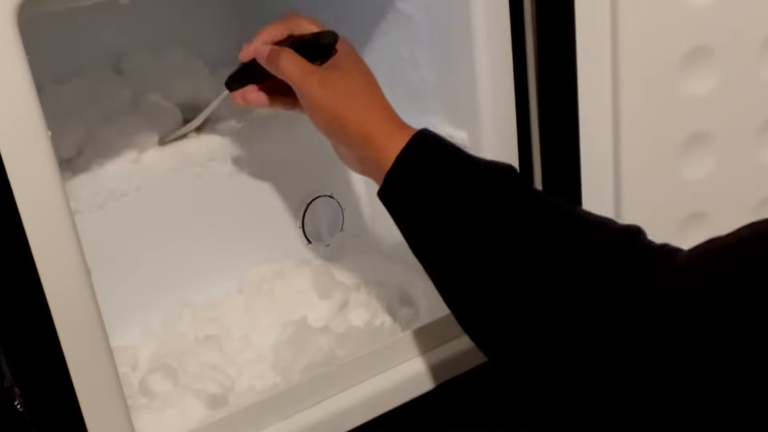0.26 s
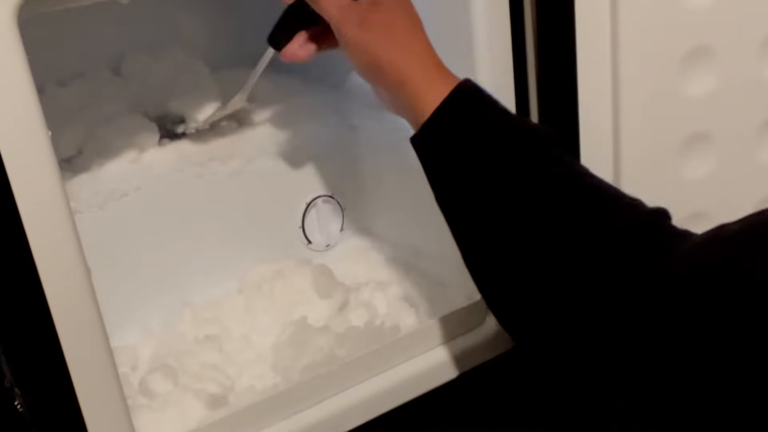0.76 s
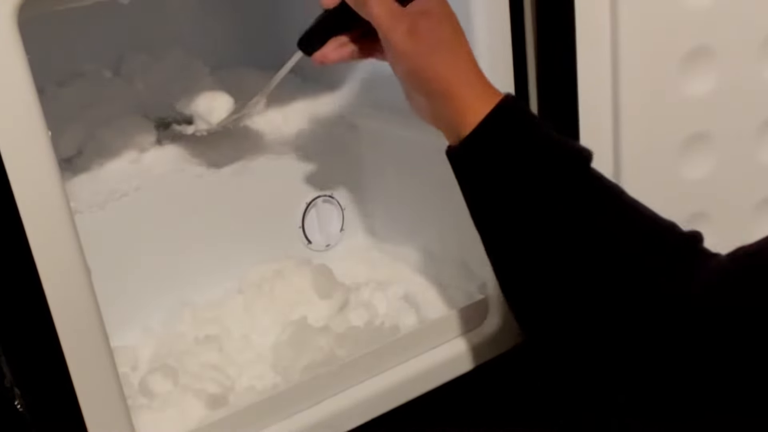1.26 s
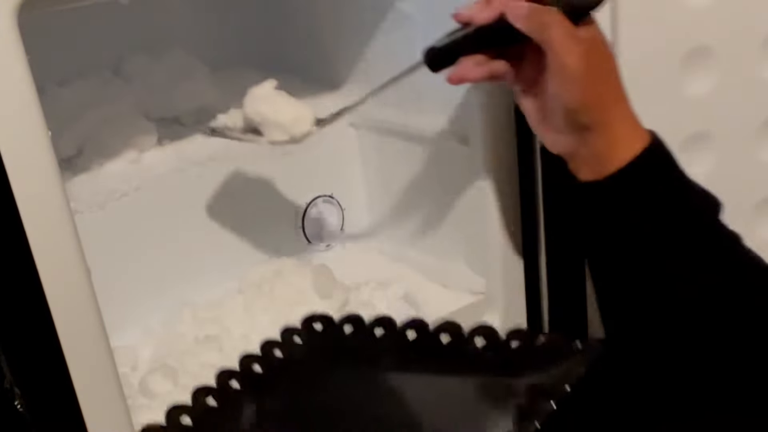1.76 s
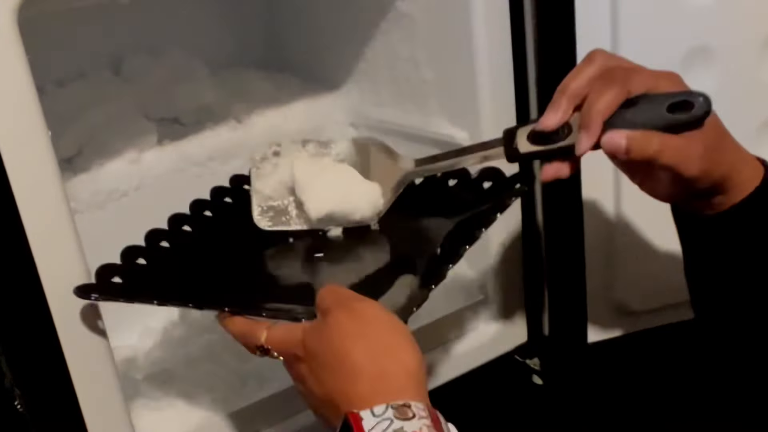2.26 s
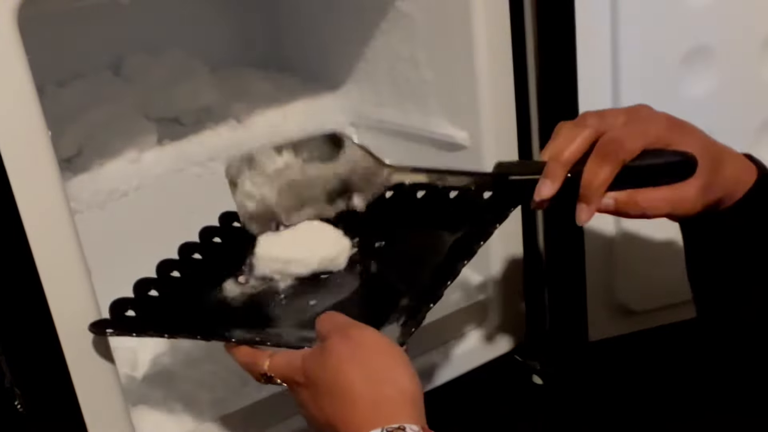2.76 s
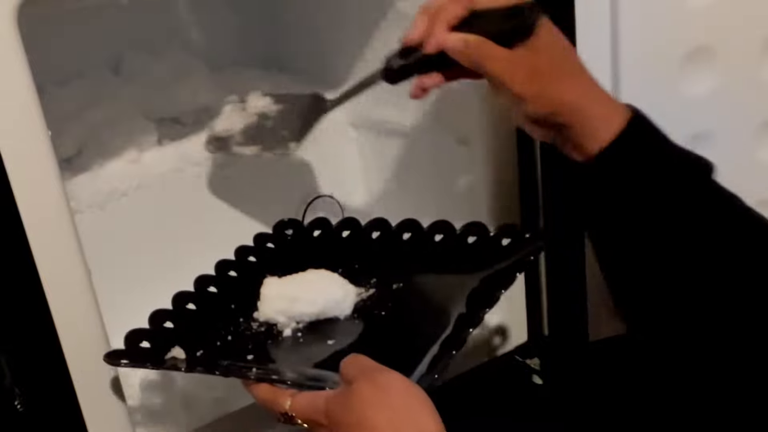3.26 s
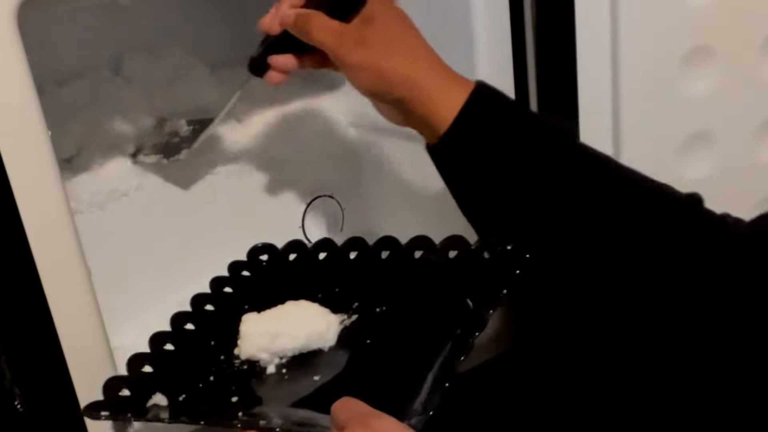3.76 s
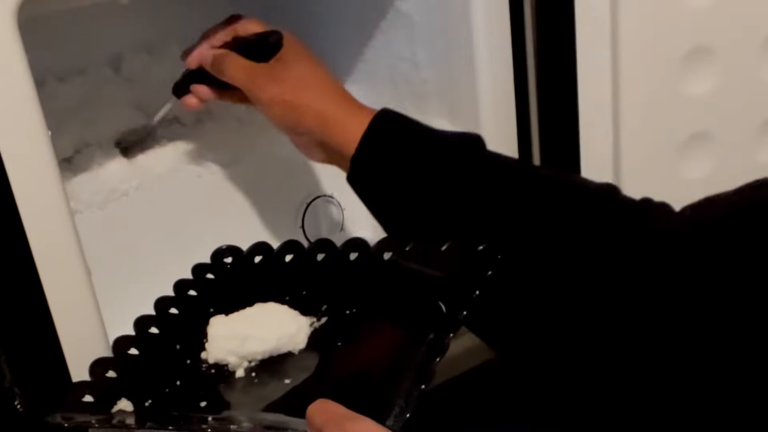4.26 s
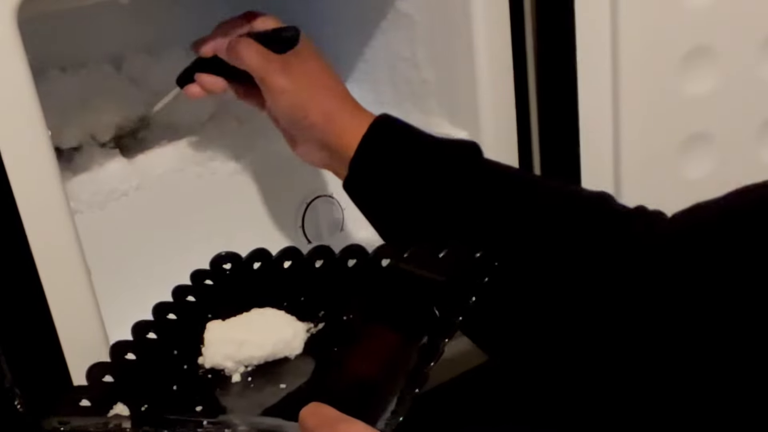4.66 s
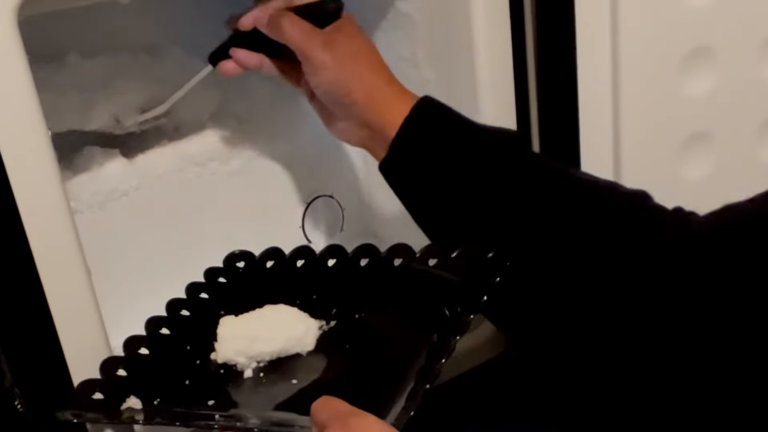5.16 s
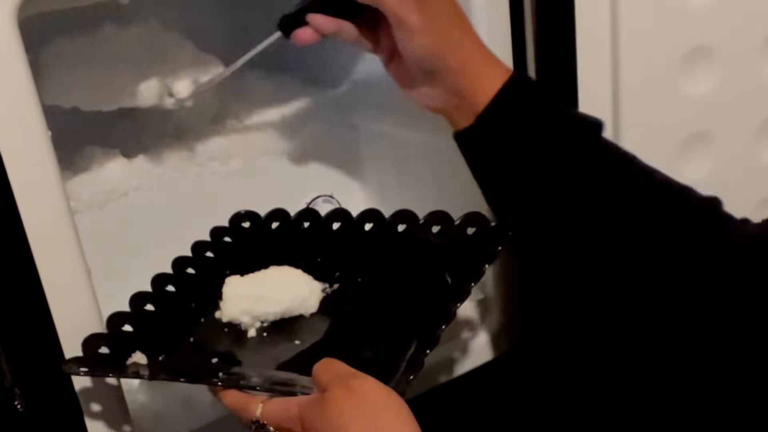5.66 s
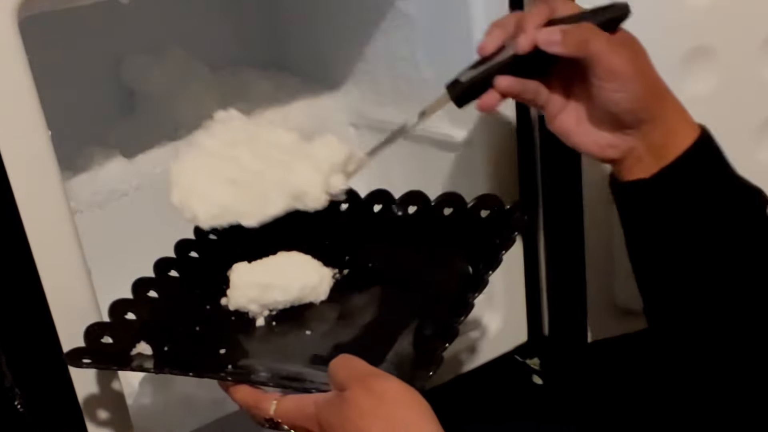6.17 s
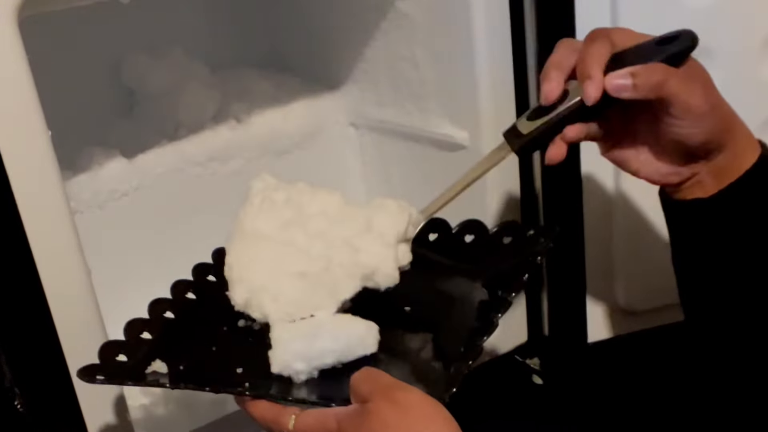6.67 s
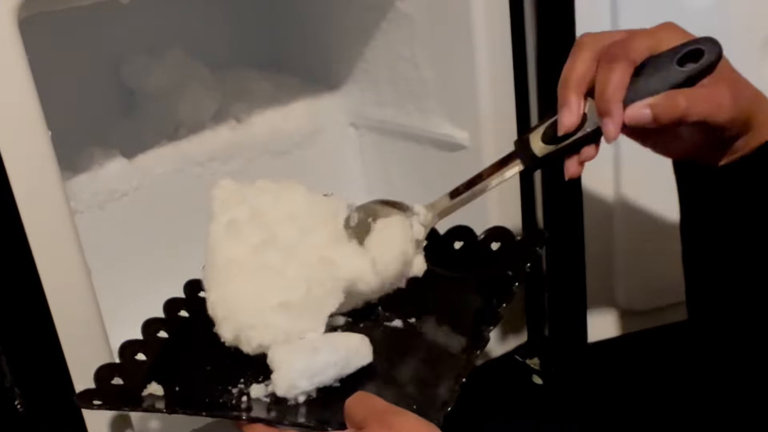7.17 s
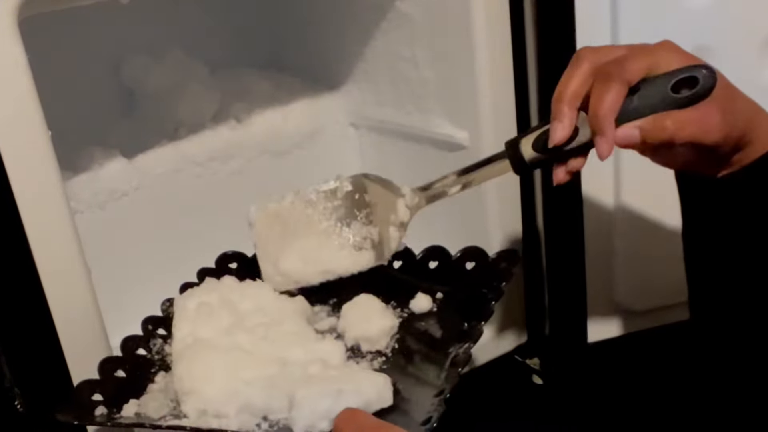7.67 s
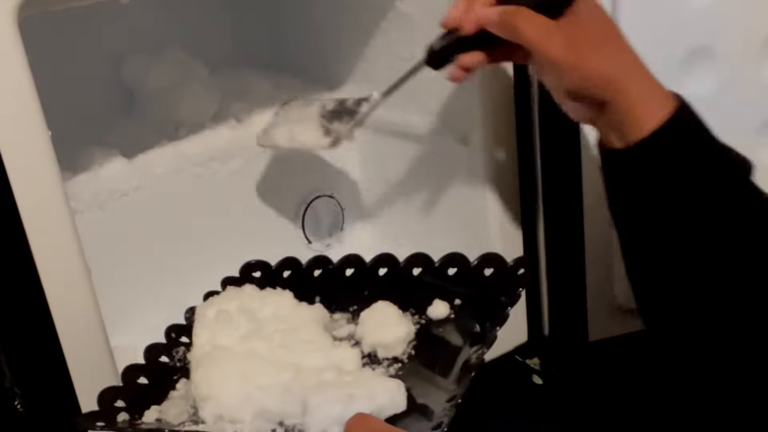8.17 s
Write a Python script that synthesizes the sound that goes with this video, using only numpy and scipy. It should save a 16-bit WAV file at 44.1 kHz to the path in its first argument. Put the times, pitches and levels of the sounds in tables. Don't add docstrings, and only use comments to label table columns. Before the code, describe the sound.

Close stereo sound at an open freezer: low compressor rumble and a faint high whine run beneath everything. From 0 to 0.3 s a metal spatula ploughs hard frost with loud, gritty crunching, then scrapes lightly until about 1 s; a few crumbs tick around 1.1-1.3 s. Near quiet follows. At 2.2, 2.4 and 2.7 s a lump lands on a plastic tray with sharp, bright cracks and scattering grains. At 3.5 s the blade strikes again; from 3.75 to 4.4 s it grinds hard, squeaking roughly, loudest near 4.06 s, until a slab snaps loose with a low knock. Softer grating and ticks fade by 5.7 s. From 6.25 s the slab scuffs and slides on the tray, cracking at 6.9 s. At 7.24-7.6 s it topples and shatters in a heavy, overloaded crunch with hollow thumps. Final cracks snap at 7.7 and 8.04 s, then crumbs die into hum by 8.4 s.

```python
import sys
import numpy as np
from scipy import signal
from scipy.fft import rfft, irfft, next_fast_len
from scipy.io import wavfile
from scipy.ndimage import uniform_filter1d, map_coordinates

SR = 44100
rng = np.random.default_rng(int(sys.argv[2]) if len(sys.argv) > 2 else 0)


def ratio_of_db(decibels):
    return 10 ** (np.asarray(decibels, float) / 20)


def master_out(mix):
    frames = np.transpose(np.atleast_2d(mix))
    ceiling = np.clip(frames, -1, 1)
    pcm = np.round(ceiling * 32767).astype(np.int16)
    wavfile.write(sys.argv[1], SR, pcm)


N = 371322

# (time [s], share [0-1])
ON_TRAY = [(0, 0), (2.0, 0), (2.1, 1), (3.2, 1), (3.3, 0), (6.0, 0), (6.1, 1), (8.42, 1)]

# (frequency [Hz], width [Hz], level [dB])
CABINET_MODES = [(192, 28.5, -0.5), (277.6, 39, -2), (391, 128, -1), (596, 140, -0.5), (737, 140, -12)]
SHELF_MODES = [(780, 250, -3), (1160, 235, -1), (1420, 244, -3), (1723, 226, -3), (2000, 550, -7.5)]
TRAY_MODES = [(850, 187, -4), (1149, 117, 2), (1590, 520, -5), (1920, 104, -0.5), (2080, 280, -9.5)]
HOLLOW_MODES = [(136, 21.5, -3.5), (196.6, 15, -2.5), (341, 81, -1.5), (505, 70, -2), (643, 124, -10.5)]
BLADE_MODES = [(3040, 380, -7.5), (5500, 3200, -22.5)]

# (frequency [Hz], density [dB per Hz])
CRUSH_SPECTRUM = [(1500, -49.5), (2600, -4), (4000, -6.5), (6500, -5), (8200, 6), (9500, -33)]
FIZZ_SPECTRUM = [(7000, -57), (8600, 0), (10500, 2), (12500, 3.5), (14000, 6.5), (15600, -4), (16500, -19)]
SPARK_SPECTRUM = [(1000, -15), (3000, -2.5), (7000, 1), (12000, -2.5), (15700, -2.5), (17000, -27)]

# (frequency [Hz], density [dB per Hz])
RUMBLE_SPECTRUM = [(20, -29), (55, 6), (130, -0.5), (220, -12.5), (380, -16.5), (470, -27), (1000, -38),
                   (3000, -48.5), (6500, -46), (9000, -41.5), (12000, -49), (16000, -55)]
# (time [s], level [dB])
FREEZER_DB = [(0.0, -24), (0.7, -27), (1.15, -25.5), (1.45, -29.5), (2.16, -27), (2.32, -25), (2.56, -26.5),
              (3.49, -26.5), (3.73, -28), (3.98, -23.5), (5.32, -27.5), (6.85, -27), (7.5, -24.5),
              (7.69, -26), (8.42, -27)]
# (frequency [Hz], width [Hz], rms level [dB])
HUMS = [(60, 20.7, -33), (125.2, 16, -39.5), (213.7, 5.1, -45.5), (265.9, 7.9, -49), (882, 28, -62.5),
        (11220, 450, -61.5)]
# (time [s], frequency [Hz], level [dB])
WHISTLE = [(0, 9150, -64), (1.3, 9170, -59), (1.5, 9130, -55.5), (3.5, 9070, -57), (4.9, 9250, -60),
           (5.4, 9400, -56), (6.1, 9360, -60), (8.42, 9420, -57)]

# (frequency [Hz], t60 [s])
ECHO_T60 = [(200, 0.43), (1000, 0.13), (5000, 0.37), (13000, 0.29)]
# (frequency [Hz], level [dB])
MID_COLOUR = [(5500, -1.5), (9000, 0.5), (11000, 1), (14000, -4)]
SIDE_COLOUR = [(60, -15.5), (140, -12), (330, -7), (600, -0.5), (1200, -6), (2700, -3.5), (5000, -1),
               (8000, -9), (10000, 4), (13500, -5.5), (15500, -3.5)]
# (frequency [Hz], level [dB])
MID_DIP = [(6400, 0), (7000, -14), (7700, -22), (8500, -18), (9050, 0), (13200, 0), (14200, -12),
           (15500, -22)]
SIDE_DIP = [(9600, 0), (10500, -9), (11300, -13), (12300, -17), (13000, -10), (13600, 0)]

# (time [s], force [dB], depth [dB])
PLOUGH = [
    (0, -24.5, 10.5),
    (.07, -17.5, 2),
    (.125, -20.5, 6.5),
    (.16, -18.5, 2),
    (.21, -20.5, 5),
    (.26, -29.5, 11),
    (.37, -33.5, 4.5),
    (.72, -34, 7.5),
    (.87, -45, 6),
    (1.08, -63, 24.5),
]
CARRY = [
    (1.36, -56.5, 2.5),
    (1.6, -52.5, 4.5),
    (2.17, -52.5, 8.7),
    (2.6, -53, 19.7),
    (2.68, -68, 19),
    (3.05, -66, 7.7),
]
THRUST = [
    (3.49, -60, 2),
    (3.52, -25.5, -17.5),
    (3.56, -31, 3),
    (3.765, -32.5, -1.5),
    (3.79, -26.5, -8.5),
    (3.96, -22, -6),
    (4.06, -17, 7),
    (4.22, -21.5, 11),
    (4.374, -22, 9),
]
PRISE = [
    (4.384, -28, 26),
    (4.42, -47, 31),
    (4.49, -39, 7.2),
    (4.55, -34.5, 2.7),
    (4.86, -34, 5.6),
    (4.93, -44.5, 9.2),
    (5.14, -40, 7.1),
    (5.46, -51.5, 2.4),
    (6.21, -69, 6.1),
]
SLIDE = [
    (6.26, -31, 4),
    (6.36, -44, -4),
    (6.468, -29, 7),
    (6.54, -36, 4.5),
    (6.68, -34.5, 2),
    (6.85, -37.5, -13),
    (7.16, -41, 6),
    (7.23, -25, -10),
]
TIP = [
    (7.24, -12, -1.5),
    (7.27, -17.5, 5),
    (7.32, -10, 7),
    (7.412, -20.5, 2),
    (7.46, -5, -8),
    (7.49, -20, 2.5),
    (7.54, -23, 5.5),
    (7.59, -32.5, 10.5),
    (7.69, -51, -5),
]
WITHDRAW = [
    (7.72, -29, -54),
    (7.84, -47, -55),
    (8.02, -56, -46),
    (8.21, -60.5, -9),
    (8.42, -67, -12),
]
# (time [s], force [dB], depth [dB], rolling time [s])
LANDINGS = [(1.104, -39.5, 18, .1), (1.151, -35.5, -15, 0.078), (1.256, -38, -24, 0.077),
            (2.219, -29, 10, .2), (2.37, -34, -9, 0.04), (2.401, -26.5, -10, 0.18), (2.69, -26, -9, .1),
            (2.71, -19.5, -27, .28), (2.741, -24.5, 9.5, 0.27), (5.152, -30.5, 2.5, 0.3),
            (6.862, -23.5, 2, 0.12), (6.886, -27.5, 0, 0.12), (7.707, -34.5, 19, 0.05),
            (7.74, -24.5, 3, 0.11), (8.043, -34, -24, 0.089)]
BURST_T60_S, CRUMBS_T60_S, SETTLE_T60_S = 0.23, 1.34, 0.074
CRUMBS_DB, GATHER_S = -15.5, 0.0029

FOLLOWS_DEPTH = [-0.016, 0.19, 1, -0.21]
ON_SHELF_DB = [-1, 2, -0.2, -2.5]
ON_TRAY_DB = [1, 1, -3, -4]
TRAY_THUMP_DB, TRAY_CRUNCH_DB = -4, -0.5

# (middle [s], length [s], level [dB], pitch [Hz])
SHELF_SCUFFS = [(.146, 0.019, -9, 2000), (.157, .01, -6.5, 3900), (0.17, 0.011, -14.5, 3500),
                (.16, .02, -8.5, 620), (.05, 0.028, -16, 1200), (.2, 0.027, -10, 1300),
                (1.045, .04, -32.5, 1200), (1.04, .04, -38, 1550), (1.118, 0.022, -33, 1400),
                (1.295, 0.011, -36, 3000), (4.068, .016, -18.5, 1090), (1, 0.045, -35, 1300),
                (1.125, .05, -29, 800), (0.99, .05, -39, 900), (3.88, 0.023, -16, 1400),
                (3.885, 0.07, -24.5, 4950), (4.05, 0.054, -19, 4900), (4.03, .09, -8, 7700),
                (4.13, .08, -26, 4900), (4.066, 0.011, -17.5, 4500), (4.27, .025, -20.5, 2870),
                (4.275, 0.0248, -19, 3900), (4.06, 0.033, -9.5, 400), (4.1, .03, -13, 421),
                (4.18, .02, -13, 550), (4.208, 0.0196, -2.5, 400), (4.27, .03, -12.5, 450),
                (4.386, 0.0116, 0, 490), (4.41, .04, 0, 430), (4.465, 0.0305, -10.5, 390),
                (3.535, .02, -17, 1700), (3.675, .025, -25, 1600), (.913, .008, -34, 3300),
                (0.94, 0.054, -34, 870), (1.2, .008, -28, 5500), (4.555, 0.04, -26.5, 5050),
                (.7, 0.086, -35, 1500), (0.694, .08, -33, 2900), (4.0, .04, -14.5, 450),
                (4.565, .035, -30.5, 3600), (4.2, 0.041, -25, 1900), (5, .1, -37, 1700),
                (4.1, .07, -35, 3100), (4.83, .08, -30.5, 1950), (4.71, 0.049, -26, 1200),
                (5.155, .02, -27, 3040), (5.245, .03, -36, 1390)]
TRAY_SCUFFS = [(2.2196, 0.004, -9, 2510), (2.234, 0.004, -14, 2900), (2.225, 0.01007, -14, 1610),
               (2.229, .018, -15, 903), (2.232, .024, -11.5, 400), (2.411, .012, -19, 1200),
               (7.745, 0.011, -19, 1490), (7.187, 0.023, -17.5, 2730), (7.187, 0.021, -17.5, 1620),
               (7.215, 0.013, -20, 1170), (7.249, .014, -1, 490), (7.2502, 0.015, 0, 1149),
               (7.27, .02, -11.5, 1715), (7.298, .008, -7.5, 596), (7.287, .012, -11, 2080),
               (7.304, 0.01795, -5, 400), (7.308, .02, -4.5, 998), (7.312, 0.032, -4.5, 2110),
               (7.322, .022, 0.5, 1220), (7.356, .012, -13, 3800), (7.361, .02, -10.5, 1480),
               (7.435, .02, -11, 2000), (7.46, 0.015, -8.5, 3195), (7.468, 0.021, -5.5, 417),
               (7.472, .018, -4.5, 1245), (7.51, .016, -10, 450), (7.51, 0.015, -6, 2990),
               (7.603, .014, -18.5, 1480), (6.275, 0.029, -21.5, 490), (6.48, 0.027, -36, 1810),
               (6.69, .06, -25, 1192), (6.701, 0.069, -30.5, 2510), (6.745, 0.019, -25, 2120),
               (6.9, .025, -24, 2190), (6.897, .02, -15.5, 520), (7.01, 0.015, -25, 1750),
               (7.125, 0.021, -27.5, 2764), (6.81, .02, -27.5, 2130), (7.654, .014, -22, 1200)]
SCUFF_SHARE, SCUFF_WANDER_HZ, SCUFF_GRAIN_DB = 0.22, 230, 4

# (time [s], peak [dB], weight [dB], shard pitch [Hz])
SHELF_CRACKS = [(.154, -9, -3.5, 3320), (.2856, -11.5, -7.5, 3320), (.4409, -34, 3, 2070),
                (.5906, -46, -7, 3140), (.753, -20.5, -29, 5100), (1.1131, -34, 0, 5000),
                (3.5073, -23, -18, 2150), (3.527, -10, -12.5, 1740), (3.665, -20.5, -9.5, 1660),
                (3.776, -15, -4, 3230), (3.8273, -23.5, 1, 3180), (3.926, -13, -18, 3350),
                (3.9527, -15, -21, 3360), (4.0629, 1, -6.5, 3200), (4.2646, -12, -6, 2860),
                (4.3795, -10.5, 7, 1930), (4.5705, -29, -6, 4970), (4.664, -16.5, -9.5, 1850),
                (5.0055, -26, -30, 5520), (5.1504, -24, -11.5, 3040), (5.292, -24, -26, 4100),
                (5.55, -39, -35, 2310), (5.61, -42, -40, 5500), (5.675, -32.5, -16, 5080)]
FIRST_LUMP_CRACKS = [
    (2.2045, -15, -4, 2720),
    (2.2183, -5, 3, 3000),
    (2.397, -27.5, -4.5, 2520),
    (2.4052, -2, -4.5, 2740),
    (2.4276, -29.5, -17, 2000),
    (2.7027, -8.5, -6.5, 1640),
    (2.7108, -0.5, -9, 3460),
    (2.742, 0.5, -8.5, 1880),
    (2.7923, -18, -26, 2600),
    (2.95, -30.5, -10, 3000),
]
SLAB_CRACKS = [(6.245, -26, 4, 2720), (6.256, -39, -6.5, 2870), (6.291, -52, -14, 2670),
               (6.472, -22, -13, 1800), (6.661, -25, -4.5, 2850), (6.731, -27, -23, 2190),
               (6.869, -33, 5, 2980), (6.889, -11, -2, 2970), (7.005, -18, -5.5, 1730),
               (7.118, -24, -3, 2760), (7.179, -12.5, -9, 2700), (7.211, -17, -6, 2850),
               (7.2416, 0, 5, 2620), (7.2943, 6, -3, 1960), (7.4307, 4, -25, 2050), (7.459, -5, 1, 2980),
               (7.505, 12, -5.5, 3030), (7.599, -11, -3, 2930), (7.6195, -28.5, 3, 3280),
               (7.6495, -13.5, -9, 3010), (7.7075, -1, -15, 2020), (7.7402, 0.5, -7, 6000),
               (7.9127, -28, -19, 5660), (7.928, -28.5, -26, 5500), (8.043, -7, -22, 5000),
               (8.375, -38, -34, 4720)]
CRACK_T60_S, HALVES_PER_DB = 0.018, 0.3042
CRUNCH_PER_WEIGHT, THUMP_PER_WEIGHT = 1, 1.42
RISE_SHARE = 0.012

# (time [s], peak [dB])
TICKS = [(.1336, -15), (0.149, -8), (.4005, -30), (.4344, -21.5), (.5726, -20), (.6459, -36), (.8345, -39),
         (1.1242, -23), (1.156, -33), (1.18, -33), (1.2639, -43), (.9083, -36), (3.778, -16), (3.665, -21),
         (4.063, -11), (4.378, -19), (2.232, -18), (2.39, -23), (2.8, -21), (2.989, -35), (6.295, -21),
         (6.413, -26), (6.448, -26), (6.557, -26), (6.786, -32), (6.805, -30), (6.941, -20), (6.981, -26),
         (7.046, -34), (7.096, -29), (7.212, -18.5), (0.155, -8.5), (3.528, -26), (1.3009, -23.5),
         (3.877, -16.5), (4.6486, -24), (4.7043, -26), (4.7791, -33), (4.797, -34), (5.0884, -36),
         (5.1486, -30), (5.2375, -24), (5.339, -33), (5.4338, -35), (5.611, -44), (7.006, -39), (7.283, -2),
         (7.32, -4), (7.356, -6.5), (7.441, -5), (7.601, -21), (7.652, -26), (8.377, -41)]
TICK_T60_S, TRAY_TICK_DULL_DB = 0.016, 3
# (time [s], peak [dB])
SPARKS = [(2.3685, -18.5), (5.7, -30.5), (2.2187, -12), (2.389, -24), (2.742, -5.5), (2.8942, -24.5),
          (.4885, -29), (7.2125, -17), (8.8, -21.5), (7.1205, -28), (5.0055, -27), (5.4, -28),
          (7.0055, -29), (7.2, -24), (7.7064, -5), (7.912, -23.5), (8.7, -31), (8.376, -31.5), (3.507, -26),
          (4.3795, -14.5), (2.7108, -7)]
SPARK_T60_S = 0.0058

# (time [s], level [dB], pitch [Hz], t60 [s], unsteadiness [0-1])
KNOCKS = [
    (1.18, -37, 1100, 0.079, 0.3),
    (4.3796, -1, 194, 0.12, 0),
    (5.61, -26, 4900, 0.015, 0.15),
    (7.304, -4.5, 127.6, 0.25, 0.08),
    (7.711, -11.5, 814, 0.046, 0.44),
    (8.044, -31, 1760, 0.046, 0),
    (3.781, -27, 1560, 0.087, 0),
    (6.89, -21, 1147, 0.22, 0),
    (7.625, -13.5, 1140, 0.074, 0.03),
]
# (time [s], level [dB])
SQUEAK_DB = [(3.75, -51), (3.82, -24), (3.96, -21.5), (4.074, -21.5), (4.14, -32), (4.186, -21.5),
             (4.202, -41), (4.3, -25)]
EDGE_HZ = 3310


def unit(x):
    return x / np.sqrt(np.mean(x ** 2) + 1e-20)


def along(points, hz):
    f, v = np.transpose(points)
    return np.interp(np.log(hz + 1), np.log(f + 1), v)


def curves(rows):
    s, *columns = np.transpose(rows)
    return [np.interp(np.arange(N) / SR, s, column) for column in columns]


def wobble(rate):
    knots = rng.standard_normal(int(N * rate / SR) + 4)
    return map_coordinates(knots, [np.arange(N) * rate / SR])


def filtered(x, response):
    m = next_fast_len(N + SR // 2)
    return irfft(rfft(x, m) * response(np.fft.rfftfreq(m, 1 / SR)), m)[..., :N]


def modes(table):
    def response(f):
        total = 0
        for k, (hz, width, db) in enumerate(table):
            damping = 1j * f * width
            total = total + (-1) ** k * ratio_of_db(db) * damping / (hz * hz - f * f + damping)
        return total
    return response


def scaled(response):
    def level(f):
        gain = response(f)
        return gain / np.sqrt(np.mean(np.abs(gain) ** 2))
    return level


def capsules(f, depth):
    dips = np.array([along(MID_DIP, f), along(SIDE_DIP, f)])
    return ratio_of_db(depth * dips + [along(MID_COLOUR, f), along(SIDE_COLOUR, f)])


def contact():
    force_db, depth_db = curves(PLOUGH + CARRY + THRUST + PRISE + SLIDE + TIP + WITHDRAW)
    tilt = np.array(FOLLOWS_DEPTH)[:, None]
    power = ratio_of_db(2 * (force_db + tilt * depth_db))
    t = np.arange(SR) / SR
    for s, db, deep_db, rolls in LANDINGS:
        crumbs_db = CRUMBS_DB - 60 * t / CRUMBS_T60_S - 60 * np.maximum(t - rolls, 0) / SETTLE_T60_S
        scatter = ratio_of_db(-120 * t / BURST_T60_S) + ratio_of_db(2 * crumbs_db)
        scatter *= 1 - np.exp(-t / GATHER_S)
        after = power[:, round(s * SR):][:, :SR]
        after += ratio_of_db(2 * (db + tilt * deep_db)) * scatter[:after.shape[1]]
    tray, = curves(ON_TRAY)
    return 10 * np.log10(power) + np.outer(ON_SHELF_DB, 1 - tray) + np.outer(ON_TRAY_DB, tray)


def sticking(level_db, hold):
    late = np.pad(level_db, (round(hold * SR), 0), mode="edge")[:N]
    return np.minimum(level_db, late)


def crystals(rate, spread_db, life, bed):
    draw = rng.random((2, N))
    size = -np.log(draw[1] + 0.03)
    snaps = (draw[0] < rate / SR) * ratio_of_db(spread_db * size)
    dying = signal.lfilter([1], [1, -np.exp(-1 / (life * SR))], snaps)
    return unit(bed + unit(dying))


def patchy(patchy_db):
    z = signal.stft(rng.standard_normal((2, N)), nperseg=256)[2]
    field = uniform_filter1d(rng.standard_normal(z.shape[1:]), size=3, axis=0)
    field = uniform_filter1d(field, size=6, axis=1)
    return unit(signal.istft(z * ratio_of_db(patchy_db * unit(field)), nperseg=256)[1][:, :N])


def blade(f):
    return scaled(lambda hz: ratio_of_db(along(CRUSH_SPECTRUM, hz)) * (1 + modes(BLADE_MODES)(hz)))(f)


def fizz(f):
    return scaled(lambda hz: ratio_of_db(along(FIZZ_SPECTRUM, hz)))(f)


def bodies(push, shelf_modes, tray_modes):
    tray, = curves(ON_TRAY)
    return filtered(push * (1 - tray), scaled(modes(shelf_modes))) + filtered(push * tray, scaled(modes(tray_modes)))


def frost():
    crush_db, crunch_db, cabinet_db, fizz_db = (sticking(db, hold=0.0049) for db in contact())
    tray, = curves(ON_TRAY)
    snap, crack, thump, shards = cracks()
    grit = crystals(rate=400, spread_db=2.4, life=0.0025, bed=1.0) * ratio_of_db(1.3 * wobble(24))
    lumps = crystals(rate=120, spread_db=2.0, life=0.0046, bed=1.56)
    noise = patchy(patchy_db=1.7)
    crush = filtered(ratio_of_db(crush_db + 1.5) * grit * noise, blade)
    crush += filtered(ratio_of_db(fizz_db - 2.5) * grit * noise, fizz)
    push = ratio_of_db(crunch_db - 3.0) * unit(grit + lumps) + crack * ratio_of_db(TRAY_CRUNCH_DB * tray)
    crunch = bodies(push * noise, SHELF_MODES, TRAY_MODES)
    push = ratio_of_db(cabinet_db - 3.5) * lumps + thump * ratio_of_db(TRAY_THUMP_DB * tray)
    boom = bodies(push * noise, CABINET_MODES, HOLLOW_MODES)
    snaps = filtered(snap * rng.standard_normal((2, N)),
                     lambda f: (blade(f) + ratio_of_db(-5.5) * fizz(f)) * capsules(f, depth=0.7))
    return crush + crunch + boom + shards + squeak() + knocks() + scuffs(), snaps + sparks()


def freezer():
    level_db, = curves(FREEZER_DB)
    rumble = scaled(lambda f: ratio_of_db(along(RUMBLE_SPECTRUM, f)))
    hum = scaled(lambda f: sum(ratio_of_db(db) / np.sqrt(width) * np.exp(-((f - hz) / width) ** 2)
                               for hz, width, db in HUMS))
    air = filtered(rng.standard_normal((2, N)),
                   lambda f: np.hypot(ratio_of_db(-34.0) * rumble(f), ratio_of_db(-32.5) * hum(f)))
    pitch, whistle_db = curves(WHISTLE)
    phase = 2 * np.pi * np.cumsum(pitch + 8 * wobble(40)) / SR
    whistle = ratio_of_db(whistle_db + 1.2 * wobble(14) - 4.5) * [np.sin(phase), np.cos(phase)]
    return air * ratio_of_db(level_db + 31.5) + whistle


def echo(x):
    hz, _, z = signal.stft(rng.standard_normal((2, SR // 2)), SR, nperseg=256)
    t = _
    tail = signal.istft(z * ratio_of_db(-60 * t / along(ECHO_T60, hz)[:, None]), SR, nperseg=256)[1]
    return signal.fftconvolve(x, tail / np.linalg.norm(tail[0]), axes=1)[:, :N]


def scuffs():
    out, t = np.zeros((2, N)), np.arange(N) / SR
    shake = np.array([wobble(500), wobble(500)])
    for s, length, db, hz in SHELF_SCUFFS + TRAY_SCUFFS:
        near = slice(round((s - length / 2) * SR), round((s + length) * SR))
        u = (t[near] - t[near][0]) / length
        pitch = hz + min(SCUFF_SHARE * hz, SCUFF_WANDER_HZ) * shake[:, near]
        ring = np.sin(2 * np.pi * np.cumsum(pitch, axis=1) / SR)
        out[:, near] += ratio_of_db(db) * (1 - np.exp(-12 * u)) * np.exp(-2 * u ** 3) * ring
    return out * ratio_of_db(SCUFF_GRAIN_DB * wobble(260) - 3)


def cracks():
    out, t = np.zeros((5, N + SR)), np.arange(SR // 6) / SR
    rows = SHELF_CRACKS + FIRST_LUMP_CRACKS + SLAB_CRACKS
    for (s, db, weight_db, hz), turn in zip(rows, rng.random((len(rows), 2, 1))):
        crunch_db, thump_db = CRUNCH_PER_WEIGHT * weight_db, THUMP_PER_WEIGHT * weight_db
        t60 = CRACK_T60_S * 2 ** (-HALVES_PER_DB * db)
        level = ratio_of_db(db + np.array([[-8], [crunch_db - 10.0], [thump_db - 4.0]]))
        life = np.clip(t60, 0.004, 0.3) * np.array([[0.6], [1.3], [1.6]])
        burst = 1.6 * ratio_of_db(-60 * t / 0.0028) + ratio_of_db(-60 * t / life) + 0.14 * ratio_of_db(-60 * t / (5 * life))
        shard = ratio_of_db(db - 10 - 60 * t / min(0.6 * t60, 0.025)) * np.sin(2 * np.pi * (hz * t + turn))
        rise = 1 - np.exp(-t / (RISE_SHARE * min(t60, 0.07)))
        out[:, round(s * SR):][:, :len(t)] += np.vstack([level * burst, shard]) * rise
    for s, db in TICKS:
        dull_db = TRAY_TICK_DULL_DB * np.interp(s, *np.transpose(ON_TRAY))
        under_db = np.array([[3.5 + dull_db], [7]])
        out[:2, round(s * SR):][:, :len(t)] += ratio_of_db(db - under_db - 60 * t / TICK_T60_S)
    return out[0, :N], out[1, :N], out[2, :N], out[3:, :N]


def sparks():
    out, t = np.zeros(N + SR), np.arange(SR // 40) / SR
    for s, db in SPARKS:
        out[round(s * SR):][:len(t)] += ratio_of_db(db - 60 * t / SPARK_T60_S)
    return filtered(out[:N] * rng.standard_normal((2, N)), scaled(lambda f: ratio_of_db(along(SPARK_SPECTRUM, f))))


def knocks():
    out, t, shake = np.zeros(N + SR), np.arange(SR // 4) / SR, wobble(700)
    for s, db, hz, t60, unsteady in KNOCKS:
        start = round(s * SR)
        pitch = hz * (1 + unsteady * shake[start:][:len(t)])
        ring = np.sin(2 * np.pi * np.cumsum(pitch) / SR)
        out[start:][:len(t)] += ratio_of_db(db - 60 * t / t60) * ring * (1 - np.exp(-t / 0.00089))
    return out[:N]


def squeak():
    pitch = EDGE_HZ * (1 + 0.005 * wobble(25) + 0.033 * wobble(400))
    phase = 2 * np.pi * np.cumsum(pitch) / SR
    sounding = np.abs(np.arange(N) / SR - 4.02) < 0.27
    level_db = curves(SQUEAK_DB)[0] - 1.5 + 3.5 * wobble(120)
    return ratio_of_db(level_db) * sounding * [np.sin(phase), 0.4 * np.cos(phase)]


def scene():
    strokes, snaps = frost()
    diffuse = strokes + ratio_of_db(-8.0) * echo(strokes + snaps) + freezer()
    return snaps + filtered(diffuse, lambda f: capsules(f, depth=1))


def treble_gate(pair, under_db, above_hz):
    hz, _, z = signal.stft(pair, SR, nperseg=2048)
    power = np.abs(z[:, :1024]) ** 2
    bands = power.reshape(2, 64, 16, -1).sum(axis=2).repeat(16, axis=1)
    weak = (bands < ratio_of_db(-2 * under_db) * bands[::-1]) & (hz[:1024, None] > above_hz)
    z[:, :1024] *= ~weak
    return signal.istft(z, SR, nperseg=2048)[1][:, :N]


def band_limit(x):
    return signal.sosfilt(signal.butter(12, 15780, fs=SR, output="sos"), x)


def record(dry):
    left, right = np.clip([dry[0] + dry[1], dry[0] - dry[1]], -1, 1)
    mid, side = treble_gate(np.array([left + right, left - right]) / 2, under_db=8, above_hz=5000)
    mix = np.clip([mid + side, mid - side], -1, 1)
    return band_limit(mix)


dry = scene()
out = record(dry)
master_out(out)
```